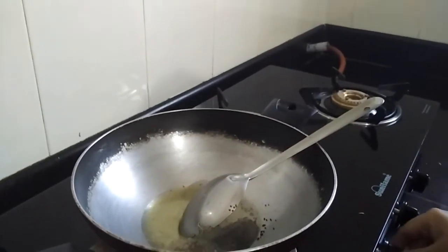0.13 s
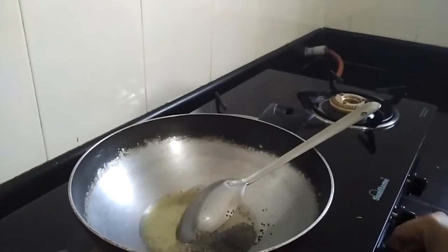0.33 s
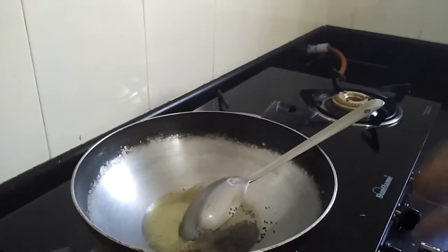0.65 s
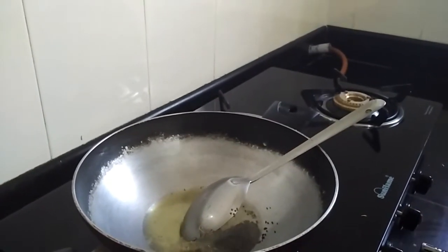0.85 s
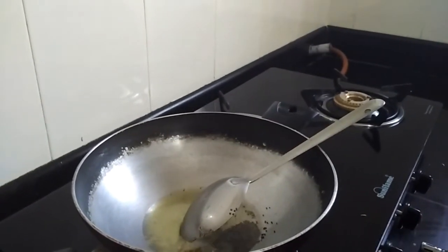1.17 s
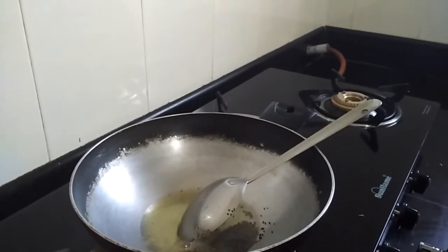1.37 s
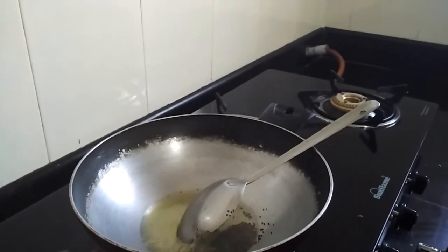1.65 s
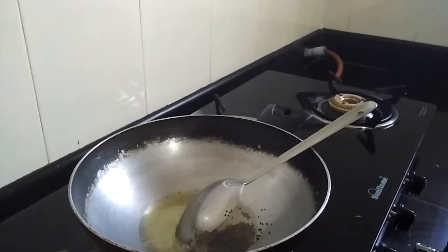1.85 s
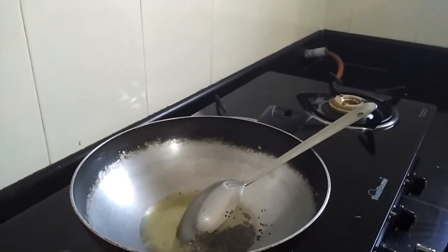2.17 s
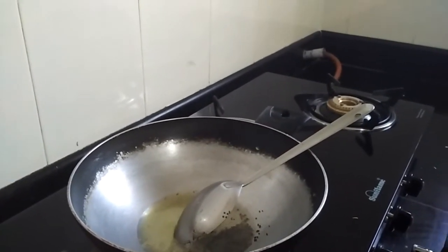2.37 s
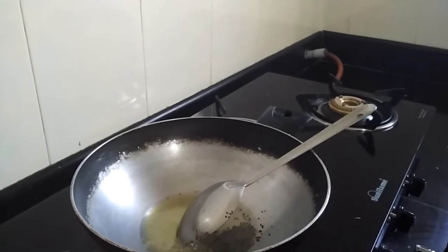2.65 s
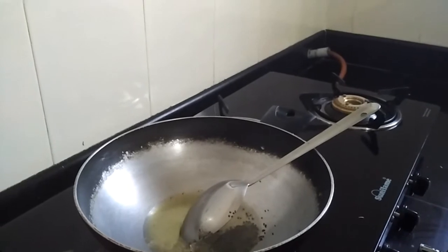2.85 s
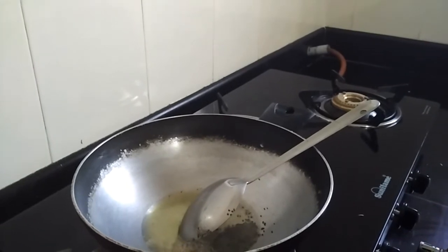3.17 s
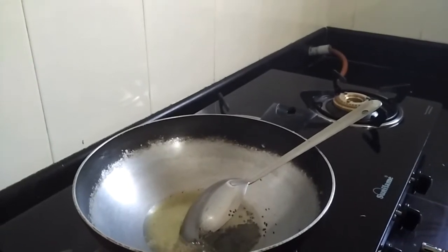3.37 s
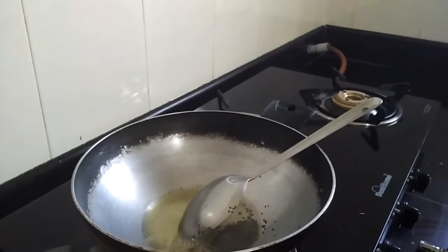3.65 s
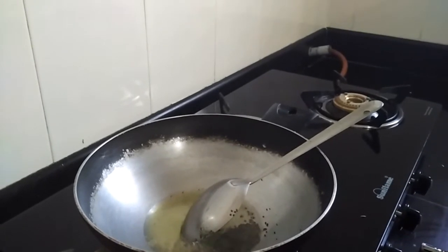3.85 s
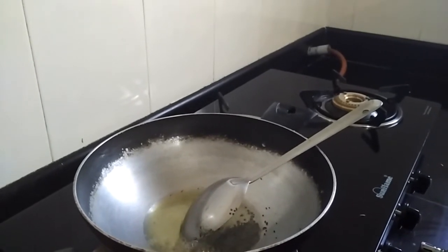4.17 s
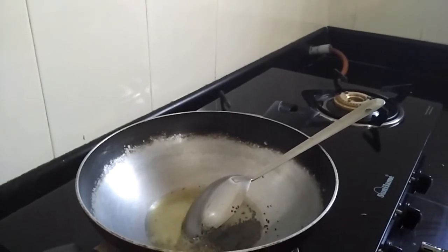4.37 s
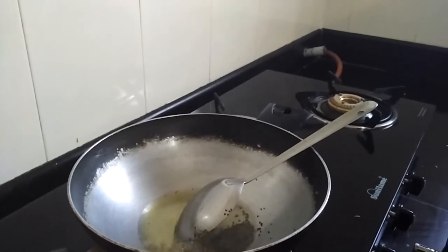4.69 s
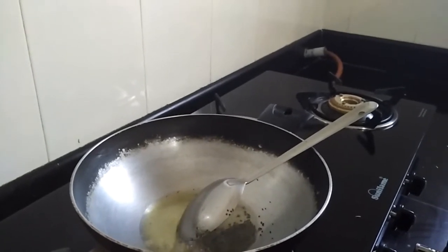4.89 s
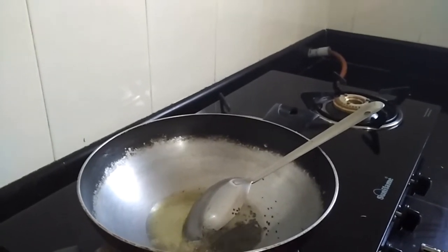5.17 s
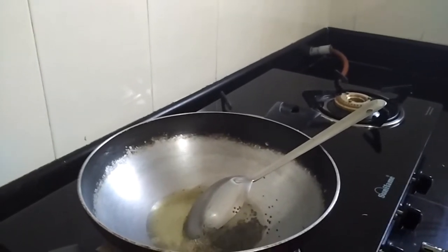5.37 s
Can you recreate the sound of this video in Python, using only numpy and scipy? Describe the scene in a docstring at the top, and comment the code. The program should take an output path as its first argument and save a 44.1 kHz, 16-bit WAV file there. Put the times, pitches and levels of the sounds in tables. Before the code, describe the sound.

Seeds crackle in hot oil in a steel pan, heard close in stereo in a tiled kitchen, with a short bright reverberation after each burst. From 0.2 to 0.75 s come small crisp ticks, then a few sparse snaps from 1.0 to 1.8 s while the fine bubbling fizz swells slightly around 1.4 s. A loud pop with a ringing tail lands at about 2.4 s, followed by medium cracks to 3.1 s. After lighter spluttering, a tight, sharp flurry snaps from 3.7 to 4.0 s. It quiets briefly, then heavier, duller bursts hit at 4.6 s and 4.9 to 5.0 s, with bright cracks near 5.15 s and a pitched steam pop at 5.4 s. Tiny wet pops fill the gaps, with faint hollow knocks, notably at 1.4, 1.9 and 2.3 s. Fizz rises again near 3.9 and 5.1 s over quiet air and a wavering low hum. The left side is brighter.

```python
"""Seeds cracking in hot oil

Seeds crack and splutter in a steel pan, in a tiled kitchen that rings after every burst. Each crack,
bursting steam pocket and dull knock is a short noise burst through resonances, plus a decaying noise tail.
Tiny bubbles fizz as a random stream of snaps; a low hum wavers in steady air noise.
The left microphone port faces the pan and is brighter."""
import sys
import numpy as np
from scipy import signal
from scipy.fft import rfft, irfft, next_fast_len
from scipy.io import wavfile
from scipy.ndimage import uniform_filter1d, map_coordinates

SR = 44100
rng = np.random.default_rng(int(sys.argv[2]) if len(sys.argv) > 2 else 0)


def generate_wav(signal):
    """Clip the signal to [-1, 1] and save it as 16-bit WAV at the path in sys.argv[1]."""
    frames = np.transpose(np.atleast_2d(signal))
    scaled = np.clip(frames, -1, 1) * 32767
    pcm = np.round(scaled).astype(np.int16)
    wavfile.write(sys.argv[1], SR, pcm)


N = 243873
TIME = np.arange(N) / SR  # seconds


def amp(db):
    """Turn dB into gain."""
    return 10 ** (np.asarray(db) / 20)


def unit(x):
    """Scale x to rms 1."""
    return x / np.sqrt(np.mean(x ** 2) + 1e-20)


def along(points, hz):
    """Read a curve of (Hz, value) points, straight between points on a log frequency axis."""
    point_hz, value = np.transpose(points)
    return np.interp(np.log(hz + 1), np.log(point_hz + 1), value)


def curves(rows):
    """Draw one value per sample for each column after the time."""
    seconds, *columns = np.transpose(rows)
    return [np.interp(TIME, seconds, column) for column in columns]


def wobble(rate):
    """Draw a smooth random curve with this many knots a second."""
    knots = rng.standard_normal(int(N * rate / SR) + 4)
    return map_coordinates(knots, [TIME * rate])


def filtered(x, response):
    """Multiply the spectrum of x by a response of frequency, padded so that tails do not wrap round."""
    size = next_fast_len(x.shape[-1] + 4096)
    spectrum = rfft(x, size) * response(np.fft.rfftfreq(size, 1 / SR))
    return irfft(spectrum, size)[..., :x.shape[-1]]


def peak(hz, centre_hz, width_hz):
    """Give the response of one causal resonance, with gain 1 at its centre."""
    damping = 1j * hz * width_hz
    return damping / (centre_hz ** 2 - hz ** 2 + damping)


# The crackling seeds. Each row: start in seconds, level in dB, room tail against direct sound in dB,
# sharpness in dB (extra treble from about 11 kHz up).
SEED_CRACKS = [(0.2162, -25.5, 1, 11.5), (0.389, -26, 4.5, -32), (0.428, -29, -6, 11), (0.4547, -26, 1, -8),
               (0.48, -26.5, 0, -12), (0.5114, -30.5, 6, -4), (0.584, -31, 7, 2), (0.6528, -27.5, 1, 6),
               (0.7246, -31, 6, -3), (1.0434, -23, -0.5, -48), (1.1434, -26, 5, -2), (1.1876, -22, -2, -6),
               (1.4291, -28, 6.5, -14), (1.7849, -28, 5.5, -4), (2.0656, -33, -2, 2),
               (2.1049, -23, 1.5, 12.5), (2.232, -32, -2, 12), (2.3142, -18.5, 3.5, 10.5),
               (2.3735, -11, 6.5, 0.5), (2.569, -22, 5.5, -23), (2.6919, -23, 2.5, 1), (2.7532, -26, -4, 7),
               (2.7591, -22, 2, 10), (2.8057, -26.5, 4, 4), (2.8618, -30.5, 7.5, -12),
               (3.0542, -24.5, 4.5, 8), (3.1143, -24.5, 3, 12), (3.19, -35, 4, 13), (3.3874, -32.5, 2, 11),
               (3.4435, -41, -10, -21), (3.4899, -24, 3, -37), (3.515, -24, -2.5, -39), (3.635, -33, 8, -6),
               (3.7168, -22, -1, 8.5), (3.7721, -19, 1, 12.5), (3.809, -17.5, -2.5, 1),
               (3.813, -16, 1, 11.5), (3.8918, -17, -1.5, 7), (3.993, -27, -7, 0), (4.0039, -22, 0.5, 18.5),
               (4.031, -32, 3, -5), (4.116, -32.5, 1, 3), (4.2357, -28, 8.5, -3), (4.378, -36.5, 9.5, -3),
               (4.4521, -29, 8, -33), (4.6366, -13.5, -2, -40), (4.7553, -30, 5, -4),
               (4.8018, -18.5, 0.5, -30), (4.8732, -30.5, 5, -67), (4.9374, -16, 0.5, -6),
               (4.9852, -13.5, 4.5, -27), (5.1272, -18, 1, 8), (5.1538, -14.5, -2, 13),
               (5.2676, -28, 4, -16), (5.3057, -33, 13.5, -18), (5.385, -27.5, 8.5, -58),
               (5.4778, -28, 10.5, -30)]
# Basic tone of every crack. Each row: frequency in Hz, level per Hz in dB.
CRACK_COLOUR = [(120, -20), (200, -13), (491, -11.5), (836, -12), (2330, -9), (2560, -6), (3490, -3.5),
                (5230, -0.5), (7970, -3), (13600, -11.5), (16000, -23)]
SEED_HZ, SEED_HZ_PER_DB = 8540, 31  # where a seed rings; sharper cracks ring higher
RISE_S = 0.0012  # a crack peaks this soon
BODY_DB, BODY_PER_DB = -11.5, 0.24  # body below 2 kHz; it grows with sharpness


def pops():
    """A husk splits: a short crack, answered at once by the pan wall, brightest where the seed rings."""
    out, t = np.zeros((2, N + SR)), TIME[:1024]
    snap = (t / RISE_S) ** 2 * np.exp(-2 * t / RISE_S)
    pan_answer = 0.2 * np.interp(t - .002, t, snap, left=0)  # 2 ms later
    crack = snap + pan_answer
    for (s, db, wet_db, sharp_db), tail in zip(SEED_CRACKS, tails(count=len(SEED_CRACKS))):
        seed_hz = SEED_HZ + SEED_HZ_PER_DB * sharp_db
        body_db = BODY_DB + BODY_PER_DB * sharp_db

        def colour(hz):
            body = amp(body_db) / (1 + (hz / 1800) ** 4)
            edge = amp(sharp_db) / (1 + (11000 / (hz + 1)) ** 6)
            ring = peak(hz, seed_hz, 0.31 * seed_hz)
            return amp(along(CRACK_COLOUR, hz)) * (.5 + ring + body + edge)

        add(out, s, db, crack, colour, tail, wet_db, swell=0.0012)
    return out[:, :N]


# Steam pockets bursting in the oil. Each row: start in seconds, level in dB, pitch in Hz, width in Hz.
STEAM_POCKETS = [(0.429, -29.5, 5680, 1100), (0.434, -37.5, 1520, 2500), (0.895, -30.5, 5530, 2600),
                 (1.8, -37, 5420, 790), (1.829, -32.5, 4950, 800), (1.851, -40, 4170, 800),
                 (2.027, -39, 4300, 1300), (2.488, -33, 4430, 1500), (2.643, -39.5, 2450, 600),
                 (2.668, -36, 2730, 500), (2.885, -37, 2520, 410), (2.897, -32.5, 3220, 700),
                 (2.932, -28.5, 3100, 3020), (3.056, -32, 2560, 350), (3.265, -39, 2560, 345),
                 (3.295, -33.5, 5440, 900), (3.304, -34.5, 4130, 1100), (3.325, -37.5, 3750, 500),
                 (3.413, -35, 2470, 500), (3.423, -34, 2970, 900), (3.443, -29.5, 2340, 350),
                 (3.489, -31, 6860, 700), (3.515, -26.5, 4760, 905), (3.587, -37, 4660, 900),
                 (3.796, -31.5, 4100, 1200), (3.823, -34, 2530, 900), (3.846, -36.5, 2950, 800),
                 (4.041, -38, 4100, 400), (4.1, -37, 4480, 925), (4.232, -27.5, 4500, 1080),
                 (4.257, -45, 2540, 495), (4.29, -38, 4340, 500), (4.401, -38, 4170, 600),
                 (4.479, -30.5, 4990, 1010), (4.587, -34, 4040, 700), (4.635, -16, 2540, 670),
                 (4.647, -42, 2380, 500), (4.87, -28, 5630, 497), (4.969, -33, 4600, 800),
                 (4.982, -19, 2430, 350), (5.058, -34.5, 2330, 350), (5.255, -37.5, 2510, 400),
                 (5.268, -29, 2750, 253), (5.288, -32, 5520, 490), (5.335, -30.5, 4870, 600),
                 (5.348, -27, 4110, 400), (5.399, -20.5, 2400, 313), (5.478, -28, 3680, 610),
                 (5.522, -24.5, 4940, 700), (5.522, -27.5, 2500, 400)]
# Overtone level of a 2.5 kHz, -34 dB pocket; lower and louder ones have more.
OVER_DB, OVER_DB_PER_OCTAVE, OVER_PER_DB = -21, -18, 0.7


def pockets():
    """A steam pocket rings at its pitch as it bursts; lower and louder ones carry stronger overtones."""
    out, t = np.zeros((2, N + SR)), TIME[:1500]
    push = np.exp(-t / 0.012) * (1 - np.exp(-t / 0.00031))
    for (s, db, pitch, width), tail in zip(STEAM_POCKETS, tails(count=len(STEAM_POCKETS))):
        over_db = OVER_DB + OVER_DB_PER_OCTAVE * np.log2(pitch / 2500) + OVER_PER_DB * (db + 34)

        def ring(hz):
            note = peak(hz, pitch, width) ** 2
            skirt = amp(-16) * peak(hz, pitch, 4 * width)
            second = amp(0.5) * peak(hz, 2 * pitch, 1.2 * width) ** 2
            third = peak(hz, 3.05 * pitch, 0.5 * width) ** 2
            hiss = amp(-27.5)  # equal at all frequencies
            return note + skirt + amp(over_db) * (second + third) + hiss

        add(out, s, db, push, ring, tail, wet_db=4, swell=0.004)
    return out[:, :N]


# Something knocking dully. Each row: start in seconds, level in dB, pitch in Hz.
DULL_KNOCKS = [(0.441, -43.5, 710), (0.799, -49.5, 585), (1.371, -37, 537), (1.933, -38, 635),
               (1.948, -46, 530), (2.029, -50, 473), (2.299, -42, 570), (2.336, -37.5, 600),
               (2.497, -42, 547), (2.586, -46, 462), (3.567, -44, 530), (4.015, -44.5, 570),
               (4.2, -47, 517), (4.911, -46, 547), (5.151, -49.5, 533)]
THUD_DB, THUD_PER_DB = -6.5, 1.26  # thud under a -43.5 dB knock; harder knocks thud more


def knocks():
    """A dull knock is a short hollow note with one weaker overtone, over a thud."""
    out, t = np.zeros((2, N + SR)), TIME[:2600]
    blow = amp(-60 * t / 0.093) * (1 - np.exp(-t / 0.00063))
    for (s, db, pitch), tail in zip(DULL_KNOCKS, tails(count=len(DULL_KNOCKS))):
        thud_db = THUD_DB + THUD_PER_DB * (db + 43.5)

        def body(hz):
            note = peak(hz, pitch, 182) ** 2
            overtone = amp(-8.5) * peak(hz, 2.02 * pitch, 190)
            thud = amp(thud_db) * peak(hz, 174, 82)
            return (note + overtone + thud) / (1 + (hz / 1500) ** 4)

        add(out, s, db, blow, body, tail, wet_db=-1, swell=0.016)
    return out[:, :N]


# How the fizz rises and falls. Each row: time in seconds, relative level in dB.
FIZZ_LEVEL = [(0.0, -45), (0.26, -47), (0.85, -40.5), (1.38, -38.5), (1.7, -47.5), (2.2, -49.5),
              (2.65, -48), (2.94, -49), (3.14, -54.5), (3.57, -48), (3.91, -41.5), (4.25, -52.5),
              (4.7, -46.5), (5.14, -38.5), (5.53, -43.5)]
# Tone of the fizz. Each row: frequency in Hz, level per Hz in dB.
BUBBLE_COLOUR = [(410, -19.5), (700, -18.5), (830, -17), (1350, -23), (2530, -16), (3070, -17.5),
                 (3280, -16), (4860, -11), (8100, -4), (13700, -14), (16000, -23)]


def fizz():
    """Thousands of tiny bubbles snap at random, some louder than the rest; the room blurs them."""
    level_db, = curves(FIZZ_LEVEL)
    loudness = amp(np.minimum(3 * rng.exponential(size=N), 12))
    size = loudness * (rng.random(N) < 900 / SR)  # about 900 snaps a second
    snaps = unit(uniform_filter1d(size, size=44) * rng.standard_normal((2, N)))  # 1 ms of noise each
    snaps *= amp(level_db + 2 * wobble(25))
    wet = signal.fftconvolve(snaps, tails(count=1)[0], axes=1)[:, :N]
    heard = amp(-6) * snaps + wet

    def colour(hz):
        return amp(along(BUBBLE_COLOUR, hz))

    colour_rms = np.sqrt(np.mean(colour(np.linspace(0, SR / 2, num=500)) ** 2))
    return amp(-3.0) * filtered(heard, colour) / colour_rms


# How the hum wavers. Each row: time in seconds, low tone level in dB, upper tone level in dB.
HUM_LEVELS = [(0.0, -72, -61), (1.14, -70, -63.5), (1.57, -73, -84), (1.96, -65, -65.5), (2.55, -61, -60),
              (2.77, -77, -70), (2.94, -71, -54), (3.12, -72, -85), (4.51, -77, -79), (5.27, -72, -62.5),
              (5.53, -64, -57)]
# The two hum tones, low then upper. Each row: centre in Hz, width in Hz.
HUM_TONES = [(86, 21), (135, 41)]
# Tone of the kitchen air. Each row: frequency in Hz, level per Hz in dB before scaling to rms 1.
AIR_COLOUR = [(12, -50), (20, -13), (54, -19), (69, -21.5), (141, -1), (218, -9.5), (264, -5.5),
              (312, -10.5), (691, -15), (871, -15), (1240, -22.5), (3000, -19), (3900, -56), (6600, -120)]
AIR_DB = -64  # centre of a slow random drift
# A faint tone swells and fades, centred on LINGER_S.
LINGER_S, LINGER_LONG_S, LINGER_HZ, LINGER_DB = 2.153, 0.12, 512.5, -61.5


def fuzzy_tone(centre_hz, width_hz):
    """Noise through a narrow resonance makes a tone of unsteady strength, here at rms 1."""
    return unit(filtered(rng.standard_normal((2, N)), lambda hz: peak(hz, centre_hz, width_hz) ** 2))


def kitchen():
    """Filtered air noise, and a hum of two fuzzy tones that come and go over a faint third."""
    air = unit(filtered(rng.standard_normal((2, N)), lambda hz: amp(along(AIR_COLOUR, hz))))
    sound = amp(AIR_DB + 1.6 * wobble(3.9)) * air
    sound += amp(-72) * fuzzy_tone(263.2, 18)
    for (centre, width), level_db in zip(HUM_TONES, curves(HUM_LEVELS)):
        sound += amp(level_db) * fuzzy_tone(centre, width)
    swell_and_fade = np.exp(-((TIME - LINGER_S) / LINGER_LONG_S) ** 2)
    return sound + amp(LINGER_DB) * swell_and_fade * fuzzy_tone(LINGER_HZ, 30)


# How long the tiled room rings. Each row: frequency in Hz, time to fall by 60 dB in seconds.
ROOM_DECAY = [(400, 0.38), (3000, 0.55), (8000, 0.34), (15000, 0.31)]


def tails(count):
    """Stereo room tails of energy 1: noise where each frequency dies at its own speed, in ragged patches."""
    noise = rng.standard_normal((count, 2, SR * 2 // 5))
    hz, t, z = signal.stft(noise, SR, nperseg=256)
    patches = rng.standard_normal((count, 1) + z.shape[2:])
    patches = uniform_filter1d(patches, size=4, axis=2)  # along frequency
    patches = uniform_filter1d(patches, size=5, axis=3)  # along time
    ragged_db = 2.2 * unit(patches)
    decay_db = -60 * t / along(ROOM_DECAY, hz)[:, None]
    tail = signal.istft(z * amp(ragged_db + decay_db), SR, nperseg=256)[1]
    return tail / np.linalg.norm(tail, axis=-1, keepdims=True)


def add(out, s, db, envelope, colour, tail, wet_db, swell):
    """Add a coloured noise burst, and from the first wall on its room tail, swelling as echoes pile up."""
    burst = filtered(rng.standard_normal((2, len(envelope))) * envelope, colour)
    strength = amp(db) * np.linalg.norm(envelope) / envelope.max() / 2
    at = round(s * SR)
    out[:, at:at + len(envelope)] += strength * burst / np.linalg.norm(burst, axis=1, keepdims=True)
    build_up = 1 - np.exp(-TIME[:tail.shape[1]] / swell)  # swell in seconds
    wet = filtered(tail * build_up, colour)
    at += round(.003 * SR)  # the first wall answers after 3 ms
    out[:, at:at + wet.shape[1]] += strength * amp(wet_db) * wet / np.linalg.norm(wet, axis=1, keepdims=True)


# How alike left and right are. Each row: frequency in Hz, likeness (1 is the same, 0 unrelated).
LIKENESS = [(35, 0.073), (80, 0.92), (180, 0.82), (550, 0.34), (1650, 0.074), (4970, 0.053), (15000, -0.18)]


def pair(x):
    """Two signals become left and right by weighting mid against side, most alike in the bass."""
    def mid_side(hz):
        turn = np.arccos(np.clip(along(LIKENESS, hz), -1, 1)) / 2
        return np.sqrt(2) * np.array([np.cos(turn), np.sin(turn)])

    mid, side = filtered(x, mid_side)
    return np.array([mid + side, mid - side]) / np.sqrt(2)


def scene():
    """Pan sounds over the kitchen."""
    return pair(pops() + pockets() + knocks() + fizz() + kitchen())


# Balance of the two microphone ports. Each row: frequency in Hz, left minus right in dB.
PORT_BALANCE = [(35, 10), (70, 6.5), (110, -1), (200, 3.5), (380, 3.5), (700, 4.5), (1290, 4.5),
                (2380, 3.0), (4400, 4.5), (8120, 12.5), (15000, 0)]
EDGE_HZ, TOP_HZ = 15750, 16640  # the top band is 28 dB down above the first, silent from the second


def record(dry):
    """The two ports differ in brightness; the top band drops, then stops."""
    def response(hz):
        ports = amp(np.outer([.5, -.5], along(PORT_BALANCE, hz)))  # half the difference each way
        edge = np.where(hz > EDGE_HZ, amp(-28), 1) * (hz < TOP_HZ)
        return ports * edge

    return filtered(dry, response)


dry = scene()
out = record(dry)
generate_wav(out)
```